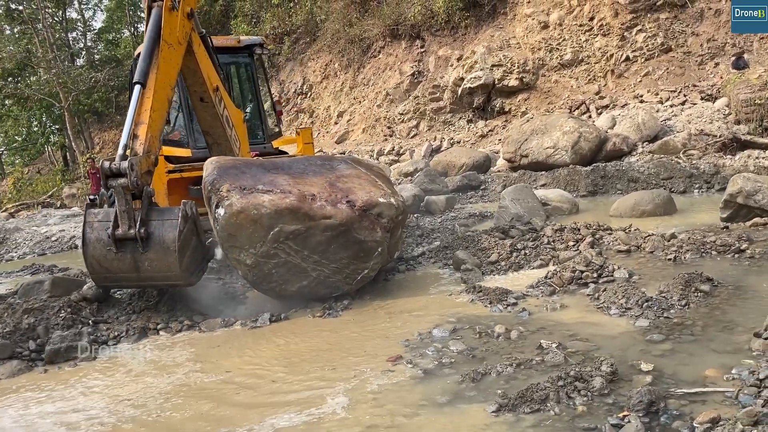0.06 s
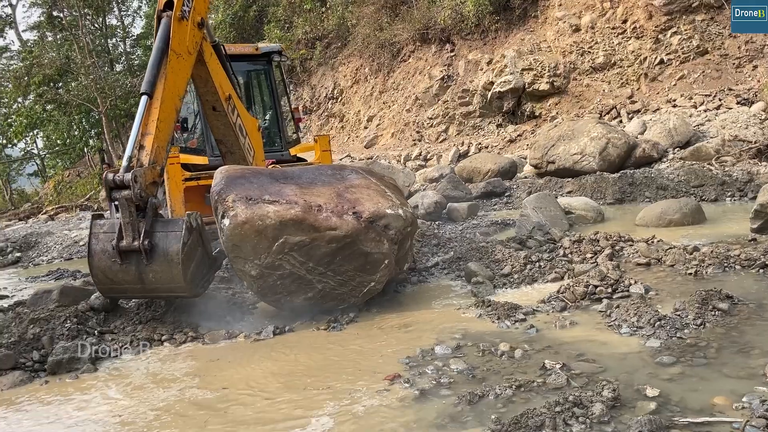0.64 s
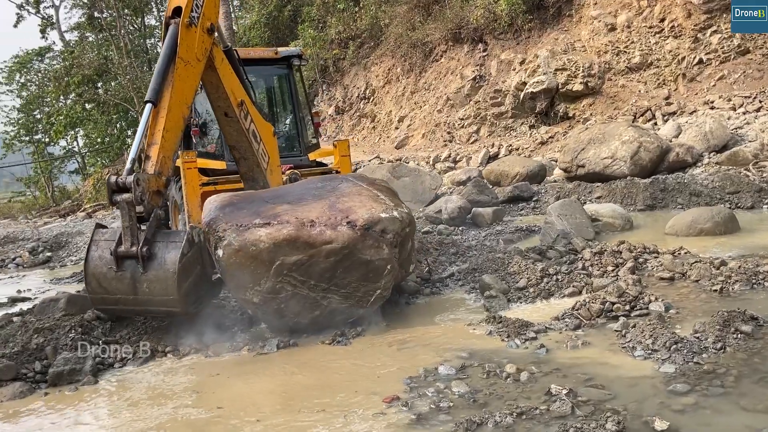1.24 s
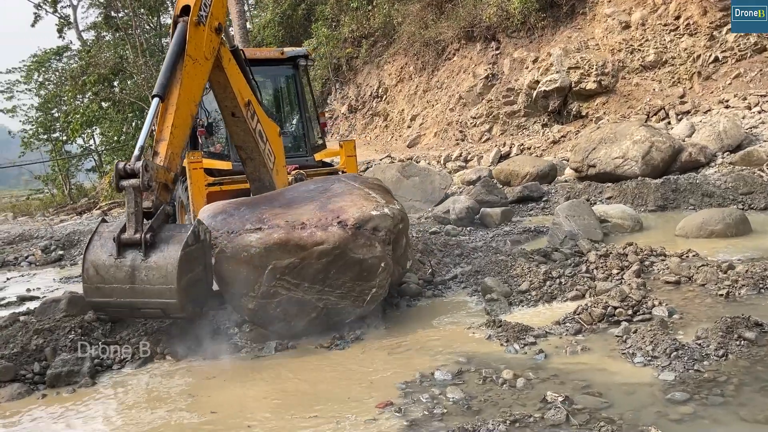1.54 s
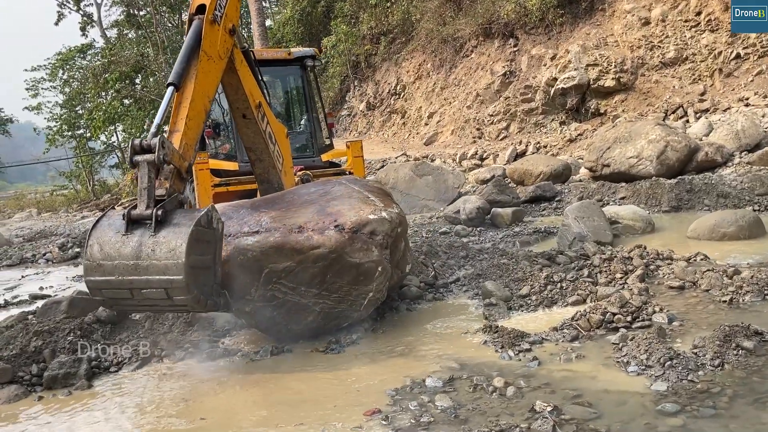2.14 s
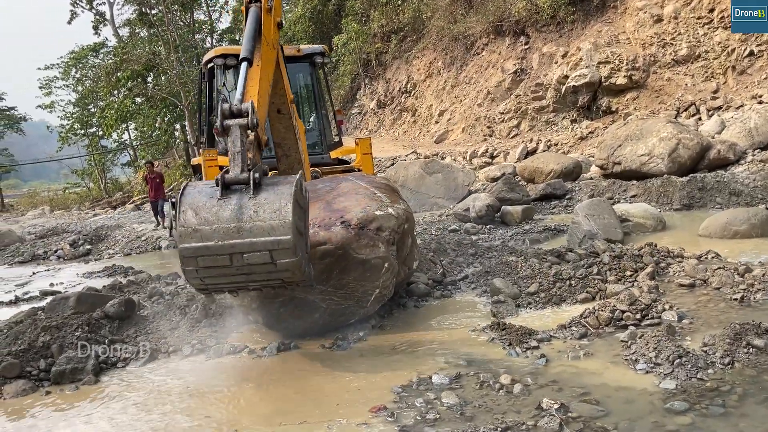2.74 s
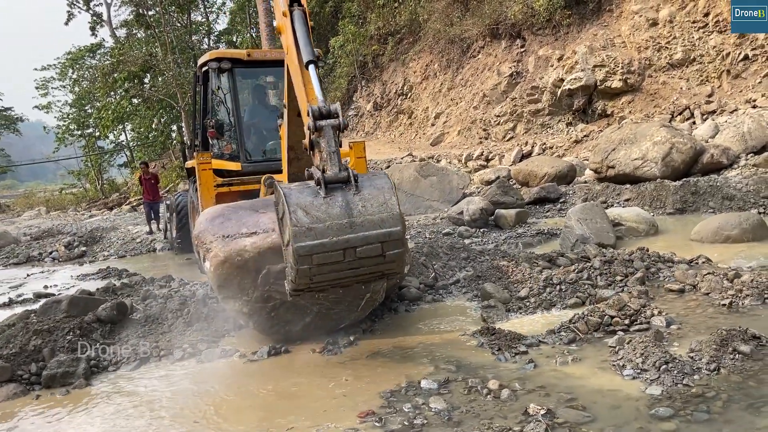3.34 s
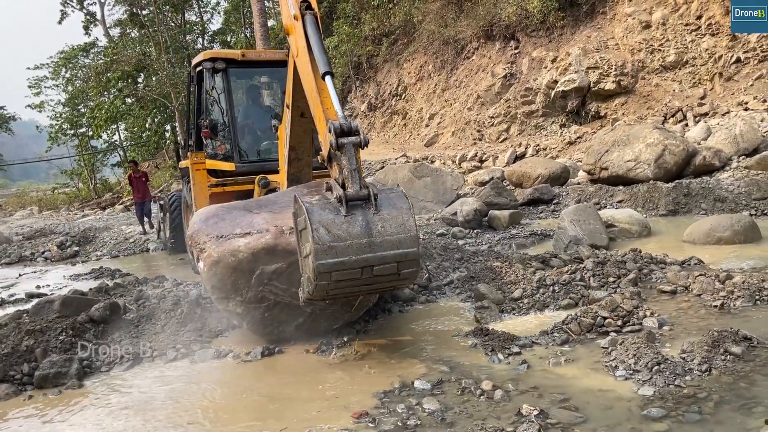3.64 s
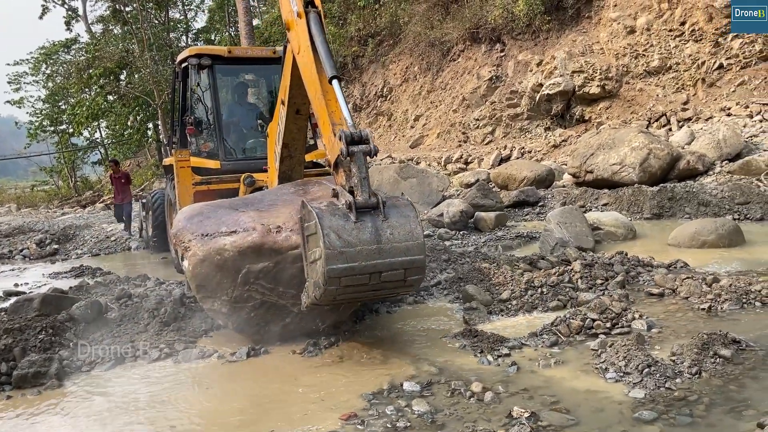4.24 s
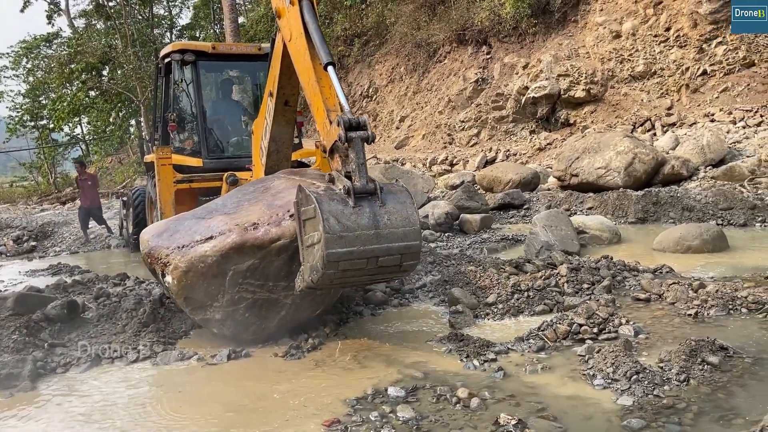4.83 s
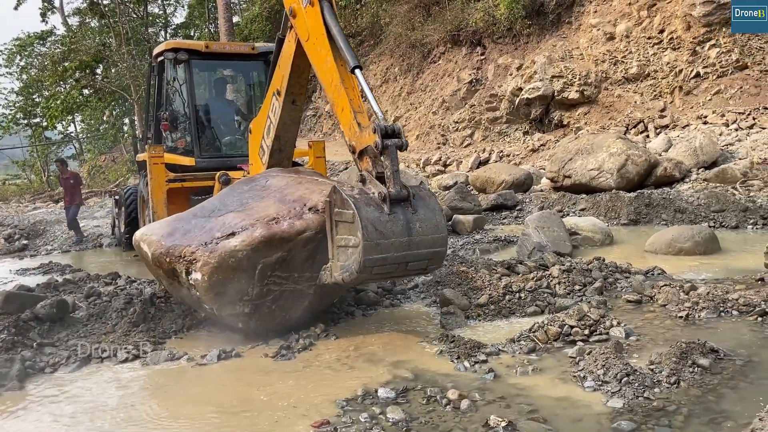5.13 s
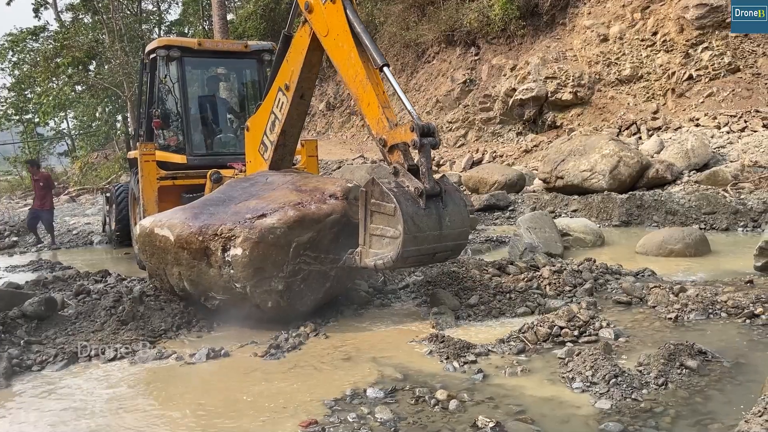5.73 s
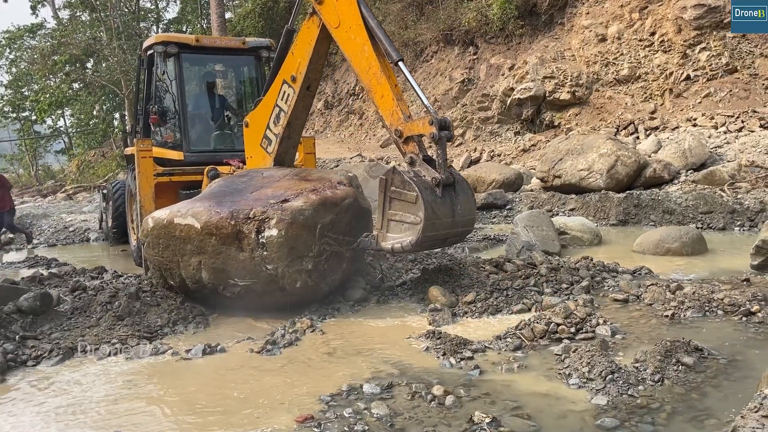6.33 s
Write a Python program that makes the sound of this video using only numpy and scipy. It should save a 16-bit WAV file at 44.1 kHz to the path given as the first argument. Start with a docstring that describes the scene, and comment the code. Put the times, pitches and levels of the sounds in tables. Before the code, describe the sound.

Over a steady diesel engine and shallow river, a digger bucket clanks and scrapes on rock, with low thuds and clicking stones.

```python
"""A backhoe loader's steel bucket works a boulder over a stony riverbed, ringing in its modes at each blow.
Stick-slip friction makes it grind, judder and groan; the boulder drags and crushes gravel amid low thuds,
cobbles knock and pebbles click. The diesel sounds harmonics of its firing rate, which sags under load,
and the river is a broadband wash behind it. The cut bank reflects a little of the work,
and a limiter ducks after the hardest blows."""
import sys
import numpy as np
from scipy import signal
from scipy.fft import rfft, irfft
from scipy.io import wavfile
from scipy.ndimage import uniform_filter1d, minimum_filter1d

SR = 44100
rng = np.random.default_rng(int(sys.argv[2]) if len(sys.argv) > 2 else 0)


def pcm_store(signal):
    """Save signal as 16-bit PCM."""
    levels = np.round(np.clip(np.atleast_2d(signal), -1, 1) * 32767)
    wavfile.write(sys.argv[1], SR, levels.astype(np.int16).T)


N = 285768
TIME = np.arange(N) / SR
BINS = np.fft.rfftfreq(N, 1 / SR)

# Levels are relative; a decay is the time to fall to 1/e.
# normal modes of the bucket: f/Hz, level/dB, T60/s
BUCKET_MODES = [(484.3, -3.5, 0.16), (580, -5.5, 0.023), (726, -17.5, 0.06), (913, -12, 0.098),
                (1042, -10, 0.069), (1088, -5.5, 0.066), (1119, -11, 0.073), (1240, -19, 0.018),
                (1333, -8.5, 0.063), (1393, -6, 0.036), (1495, -17.5, 0.05), (1534, -23, 0.049),
                (1610, -17, 0.06), (1760, -15.5, 0.053), (2130, -21.5, 0.078), (2500, -26, 0.095),
                (2920, -28, 0.04), (3510, -31, 0.088)]
# the bucket strikes the boulder: t/s, contact/s, crunch/dB, ring/dB, shell boom re ring/dB
BUCKET_KNOCKS = [(0.027, 0.012, -21, -22, -4.5), (1.012, 0.0099, -24, -20, -26),
                 (1.034, 0.02, -19, -19.5, -22), (1.254, 0.0089, -28, -19.5, -12),
                 (1.56, 0.045, -19.5, -5, -33), (3.288, 0.026, -26, -21.5, -20),
                 (3.308, 0.0048, -26, -19, -5), (3.412, 0.0077, -32, -23, 0), (3.73, 0.017, -13.5, -10, -8),
                 (3.768, 0.038, -15.5, -27, 11), (3.8, 0.049, -18.5, -18.5, 4),
                 (3.895, 0.019, -16.5, -22, -14), (3.915, 0.024, -13.5, -25.5, 6.5),
                 (5.293, 0.02, -19.5, -10, 4.5), (5.383, 0.0093, -22, -32, -8), (5.45, 0.02, -20, -15, -1),
                 (5.467, 0.014, -22.5, -15, -4), (5.585, 0.031, -7, -1, 2.5)]
# the pressed bucket breaks loose: t/s, crunch/dB, crack re crunch/dB, ring/dB, shell boom re ring/dB
BUCKET_JERKS = [(1.606, -20.5, 2.5, -22, -16), (1.659, -22.5, 3, -12, -15), (1.727, -21, 3, -11.5, -30),
                (1.795, -19, -3, -14.5, -12)]
# spectra of crushed stone, the dull crunch and the bright crack: f/Hz, level/dB
CRUNCH_SPECTRUM = [(35, -28), (60, 1), (130, 13), (250, 9.5), (380, 8.5), (560, 6.5), (850, -14.5),
                   (1200, -3), (1600, -5), (2200, -12), (3500, -25.5), (6000, -32), (12000, -30)]
CRACK_SPECTRUM = [(700, -36), (1600, 11.5), (2300, 2), (2900, 4), (3450, 5.5), (4000, 1), (4800, -1.5),
                  (7000, -7.5), (8800, -1.5), (11500, -10.5), (15000, -61)]
# a point of steel meets the rock: t/s, level/dB, f/Hz, decay/s
CLACK_HITS = [(0.029, -11.5, 1014, 0.009), (0.04, -17, 780, 0.018), (1.034, -15, 1235, 0.0065),
              (1.561, 1, 1350, 0.0076), (1.563, -10, 890, 0.0097), (1.591, -3, 1300, 0.008),
              (1.612, -14, 1290, 0.0095), (1.662, -10.5, 1050, 0.017), (1.733, -9, 1396, 0.0087),
              (1.795, -4, 607, 0.014), (1.795, -12, 1510, 0.0072), (3.414, -17.5, 912, 0.01),
              (3.731, -1, 1227, 0.0058), (3.769, -1, 520, 0.0063), (3.771, -15.5, 3440, 0.013),
              (3.804, -15, 1344, 0.0081), (3.917, -8.5, 659, 0.019), (3.919, -12, 1370, 0.0081),
              (5.295, -9.5, 1452, 0.021), (5.298, -1, 583, 0.015), (5.454, -22, 1150, 0.0064),
              (5.469, -15, 1197, 0.0098), (5.588, 1.5, 1157, 0.015), (5.589, -5, 1490, 0.01),
              (5.604, 0, 1240, 0.012)]
# modes of a clack: frequency ratio, level/dB
CLACK_PARTIALS = [(.87, -6), (1.002, 1), (1.14, -9), (1.33, -24)]
# rock slides on steel or gravel: t/s, duration/s, grind/dB, fizz/dB
SLIDE_STROKES = [(0.7, 0.44, -43.5, -49), (0.986, 0.091, -35, -56), (1.273, 0.083, -34.5, -35),
                 (1.362, 0.25, -31, -42), (1.549, 0.3, -21.5, -32.5), (1.897, 0.62, -42.5, -52),
                 (3.296, 0.41, -42, -49), (3.744, 0.09, -21.5, -34.5), (3.863, 0.31, -33, -42),
                 (4.785, 1, -37, -55.5), (5.126, 0.13, -35, -50), (5.298, 0.18, -44, -61),
                 (5.79, 0.85, -36.5, -56)]
# spectra of grinding rock and of fizzing sand: f/Hz, level/dB
GRIND_SPECTRUM = [(120, -64), (300, -45), (550, 8.5), (800, 7.5), (1150, 4), (1500, 0.5), (1850, -7.5),
                  (2300, -50), (3500, -21), (6000, -23), (12000, -42)]
FIZZ_SPECTRUM = [(1200, 18), (2400, 16.5), (3600, 14.5), (6000, 12), (8800, 9), (11500, 13.5), (15000, -48)]
# the bucket's edge rubs under pressure, and after 3.9 s the boulder rings on its own: t/s, duration/s,
# level/dB, mid-stroke f/Hz
GROAN_STROKES = [(1.387, 0.2, -27, 1109), (3.298, 0.029, -25, 894), (3.917, 0.068, -29, 749),
                 (4.02, 0.047, -33, 1293), (5.0, 0.23, -44, 1450), (5.13, 0.071, -31, 851),
                 (5.36, 0.12, -35.5, 1540), (5.287, 0.021, -21.5, 1660), (5.588, 0.0188, -12.5, 1204),
                 (5.887, 0.088, -39, 1080), (6.037, 0.098, -37.5, 1656)]
# low thuds and brief swells of the rumble: t/s, level/dB, f/Hz, time to peak/s
LOW_PULSES = [(0.021, -6.5, 121.5, 0.025), (1.57, -14.5, 136, 0.011), (1.672, -11, 141, 0.01),
              (1.716, -6.5, 128, 0.0087), (1.803, -18, 77.4, 0.018), (2.164, -19.5, 160, 0.041),
              (3.424, -16, 159, 0.027), (3.735, -9, 129, 0.015), (3.762, -4, 97, 0.0085),
              (3.797, -6, 118, 0.013), (3.913, -8.5, 120.4, 0.017), (4.02, -14, 104, .008),
              (4.113, -13, 120, 0.019), (4.248, -13, 161, 0.02), (5.302, -2.5, 142.5, 0.0099),
              (5.59, 1, 182, 0.0066), (5.594, -9, 161, 0.0077)]
# the boulder drags over its bed: t/s, duration/s, level/dB
DRAG_STROKES = [(1.565, 0.12, -29.5), (1.765, 0.08, -27), (3.74, 0.08, -22), (3.916, 0.068, -23),
                (4.02, 0.22, -37)]
# spectrum of the dragging: f/Hz, level/dB
DRAG_SPECTRUM = [(45, -18), (75, 5), (140, 9), (210, -10), (330, -1), (480, -6), (800, -9), (2000, -60)]
# cobbles collide under the boulder: t/s, level/dB, centre f/Hz
COBBLE_KNOCKS = [(1.014, -24, 1500), (1.023, -27, 2150), (1.036, -19, 1250), (1.212, -27.5, 1510),
                 (1.253, -24, 1950), (1.302, -24, 1550), (1.313, -30, 2000), (1.561, -22, 2410),
                 (1.617, -15, 2720), (1.683, -18, 2320), (1.745, -24, 2600), (1.762, -20, 1520),
                 (1.795, -16, 1704), (1.835, -21, 1406), (3.288, -18, 1130), (3.414, -26, 910),
                 (3.732, -16, 1360), (3.756, -14, 1100), (3.806, -17, 1720), (3.853, -20, 1606),
                 (3.897, -19, 1820), (3.918, -19, 1720), (3.95, -20, 1424), (4.011, -24, 1400),
                 (4.038, -27, 1380), (4.062, -25, 1220), (4.105, -29, 1870), (4.122, -23, 1250),
                 (4.134, -16, 412), (4.22, -26, 915), (4.276, -31.5, 1510), (5.056, -30, 1200),
                 (5.085, -26, 1310), (5.134, -28, 1150), (5.157, -16, 790), (5.2, -28, 1160),
                 (5.386, -27, 1560), (5.474, -26, 1920), (5.488, -16, 986), (5.918, -29, 1060),
                 (6.136, -23, 900), (6.164, -29, 1190)]
# the loudest snapping pebbles: t/s, level/dB, centre f/Hz
PEBBLE_SNAPS = [(0.028, -27.5, 5800), (1.253, -30.5, 2470), (1.293, -38, 6060), (1.311, -35, 3000),
                (1.322, -32, 5000), (1.346, -24, 8700), (1.364, -16.5, 6740), (1.378, -19, 6850),
                (1.396, -27, 5800), (1.407, -25.5, 7640), (1.428, -29, 8500), (1.463, -17.5, 10700),
                (1.48, -27, 9500), (1.503, -29.5, 8600), (1.561, -15.5, 9700), (1.587, -21, 5500),
                (1.611, -22, 6500), (1.659, -20, 6000), (1.737, -18, 5600), (1.745, -23, 5300),
                (1.793, -18, 6000), (2.207, -32, 2430), (2.283, -25.5, 2560), (2.304, -17.5, 2970),
                (2.347, -32, 5000), (2.492, -32, 9700), (2.773, -32.5, 3160), (3.086, -32, 9000),
                (3.732, -22, 7000), (3.77, -19, 3460), (3.805, -20.5, 3440), (3.775, -14, 8650),
                (4.012, -26, 4080), (4.231, -35, 3600), (4.277, -35.5, 3000), (6.118, -33, 9000)]
# faint, brief, very high chirps: t/s, level/dB, f/Hz
HIGH_CHIRPS = [(2.178, -36, 10700), (4.601, -27, 10540)]
# firing rate, which sags when the hydraulics take load: t/s, f/Hz
FIRING_RATE = [(0, 51), (.6, 52.1), (1.0, 54.8), (1.45, 53.3), (2.2, 54.3), (3.45, 55), (4.2, 54),
               (4.56, 49.1), (5.0, 50.1), (5.43, 53.9), (6.04, 49.9), (6.48, 51.7)]
# engine orders of the low exhaust note and the drone above it: multiple of the firing rate, level/dB
EXHAUST_ORDERS = [(1, -3), (1.5, -21), (2, -13), (3, -10.5), (3.5, -24), (4, -17.5)]
DRONE_ORDERS = [(4.5, -18), (5, -3.5), (6, -20), (7, -31), (8, -23.5), (11, -26.5)]
# strength of the exhaust note, which swells under load, and of the drone: t/s, level/dB
EXHAUST_LEVEL = [(0, -25.5), (.6, -27.5), (1.0, -29), (1.6, -32), (2.3, -30.5), (4.2, -28), (4.55, -27),
                 (5.0, -20.5), (5.45, -27.5), (5.9, -27), (6.48, -23)]
DRONE_LEVEL = [(0, -31), (.25, -29), (.64, -22.5), (.82, -42), (1.15, -34), (1.48, -23), (2.2, -30),
               (3.2, -31), (4.15, -38.5), (4.33, -18), (4.6, -23.5), (6.48, -22)]
# spectrum of the engine's rumble: f/Hz, level/dB
RUMBLE_SPECTRUM = [(35, -13), (60, -9), (85, -3.5), (115, -1), (160, -3.5), (200, -1.5), (260, -7.5),
                   (310, -9.5), (420, -10.5), (560, -14), (800, -20), (1200, -27), (2000, -36.5),
                   (4000, -50)]
# resonances of the engine covers: f/Hz, width/Hz, level/dB
PANEL_MODES = [(1037, 78, -49.5), (1343, 92, -54)]
# spectrum of shallow running water: f/Hz, level/dB
RIVER_SPECTRUM = [(200, 14), (600, 8.5), (1200, 8), (2200, 1.5), (4000, -1.5), (6500, -6), (9000, -2),
                  (11500, -4.5), (12400, -76), (13200, -50)]
# sound scattered from the sides: f/Hz, level/dB
SIDE_SPECTRUM = [(45, -41), (70, -21), (130, -24), (260, -16.5), (600, -10), (1250, -8.5), (2700, -4),
                 (6000, -10), (12000, -7.5)]
# phase difference between the microphone ports: f/Hz, lead of the left/rad
LEFT_LEAD = [(20, 0), (150, .02), (500, .08), (1300, .3), (3000, .6), (7800, .6), (8800, -.2), (9400, -1.5),
             (10250, -3.14), (11700, -6), (12600, -6.3)]
# level difference between the ports: f/Hz, left re right/dB
LEFT_EXCESS = [(50, -0.5), (400, 1.5), (1100, 1), (2200, 0.5), (3800, 3.5), (7000, 1.2), (10000, 0.1)]
# overall tone, with deep bass and top treble rolled off: f/Hz, level/dB
OVERALL_TONE = [(15, -36), (30, -18), (39, 0), (11700, 0), (12400, -8), (13100, -33), (15500, -37)]

CLACK_RISE_S = 0.0006  # onset of a hard contact, on steel or between cobbles


def bucket(rise_s=0.0011, release_s=0.01, jerk_s=0.038, knock_crack_db=-15.5, snap=0.23, snap_s=0.0064):
    """Impact excitation: each blow crushes stone and drives the steel, which chatters, then rings free."""
    crunch = unit(colour(grains(4000, 5.4), CRUNCH_SPECTRUM))
    crack = unit(colour(grains(5000, 3.6), CRACK_SPECTRUM))
    chatter = 0.61 * drift(220)
    t, out = TIME[:SR // 3], np.zeros(N)
    attack = 1 - np.exp(-t / rise_s)

    def blow(start, length, crunch_db, crack_db, ring_db, boom_db):
        """One contact force shapes both the noise of the stone and the ring of the steel."""
        now = slice(round(start * SR), round(start * SR) + len(t))
        touching = np.exp(-np.maximum(t - length, 0) / release_s)
        force = attack * np.exp(-t / length / 2) * touching
        crushing = amp(crunch_db) * force * (1 + snap * np.exp(-t / snap_s))
        stone = gap_echoes(crushing * (crunch[now] + amp(crack_db) * crack[now]))
        steel = amp(ring_db) * bucket_ring(force, attack, boom_db)
        return stone + steel * (1 + chatter[now] * touching)

    for start, length, crunch_db, ring_db, boom_db in BUCKET_KNOCKS:
        add(out, start, blow(start, length, crunch_db, knock_crack_db, ring_db, boom_db))
    for start, crunch_db, crack_db, ring_db, boom_db in BUCKET_JERKS:
        add(out, start, blow(start, jerk_s, crunch_db, crack_db, ring_db, boom_db))
    return out


def bucket_ring(force, attack, boom_db, shell_hz=800, first_hit=0.65, edge_echo_s=0.00123, detune=0.0081):
    """Modal resonance: damped modes start at first contact and build while the force acts."""
    t, out = TIME[:len(force)], np.zeros(len(force))
    for hz, db, t60 in BUCKET_MODES:
        turn, shift = rng.uniform(-1, 1, 2)
        build = signal.lfilter([1], [1, -1000 ** (-1 / (t60 * SR))], force)  # leaky integral of the force
        envelope = build / build.max() + first_hit * attack * amp(-60 * t / t60)
        edge_db = -0.5 * np.cos(2 * np.pi * hz * edge_echo_s)  # the echo from the edge favours some modes
        gain = amp(db + edge_db + boom_db * (hz < shell_hz)) / 2
        out += gain * envelope * np.sin(2 * np.pi * hz * (1 + detune * shift) * t + np.pi * turn)
    return out


def gap_echoes(x, echo_db=-8, longest_s=0.004, count=6):
    """Comb filtering: the gap between steel and rock adds close echoes, new ones at every contact."""
    taps = np.zeros(SR // 50)
    for late, sign in zip(rng.random(count), rng.choice([-1, 1], count)):
        taps[int(late * longest_s * SR) + 1] += sign * amp(echo_db)
    taps[0] = 1
    return signal.fftconvolve(x, taps / np.linalg.norm(taps))[:len(x)]


def clacks(detune=0.015):
    """Contact damping: a point of steel hits rock, and the pressure stops its close modes at once."""
    t, out = TIME[:SR // 8], np.zeros(N)
    attack = 1 - np.exp(-t / CLACK_RISE_S)
    for start, db, hz, decay_s in CLACK_HITS:
        shifts = 1 + detune * rng.uniform(-1, 1, len(CLACK_PARTIALS))
        ring = sum(amp(mode_db) * np.sin(2 * np.pi * hz * ratio * shift * t)
                   for (ratio, mode_db), shift in zip(CLACK_PARTIALS, shifts))
        add(out, start, amp(db) * attack * np.exp(-t / decay_s) * ring / 2)
    return out


def sliding(slip_db=1.4, fizz_slip_db=3.5, steel_db=-3, t60_share=0.06, rubble_db=-6, rubble_s=0.008):
    """Sliding friction: rock grinds in uneven slips on damped steel; rubble knocks and sand fizzes."""
    slips, t = drift(39), TIME[:SR // 8]
    damped_ring = sum(amp(db - 60 * t / (t60_share * t60)) * np.sin(2 * np.pi * hz * t)
                      for hz, db, t60 in BUCKET_MODES)
    steel = unit(signal.fftconvolve(grains(3500, 2.0), damped_ring)[:N])
    knocks = signal.fftconvolve(abs(grains(60, 0.86)), np.exp(-t / rubble_s))[:N]
    rubble = unit(colour(knocks * rng.standard_normal(N), GRIND_SPECTRUM))
    rock = unit(colour(grains(5000, 1.45), GRIND_SPECTRUM))
    grind = unit(rock + amp(steel_db) * steel + amp(rubble_db) * rubble) * amp(slip_db * slips)
    fizz = unit(colour(grains(3500, 3.5), FIZZ_SPECTRUM)) * amp(fizz_slip_db * slips)
    return sum(stroke(start, length) * (amp(grind_db) * grind + amp(fizz_db) * fizz)
               for start, length, grind_db, fizz_db in SLIDE_STROKES)


def groans(width_hz=210, climb=0.14):
    """Friction-driven vibration: rough tones of steel on rock, and once of the rock itself, rise in pitch and
    level with pressure."""
    roughness, out = drift(width_hz) + 1j * drift(width_hz), np.zeros(N)
    for start, length, db, hz in GROAN_STROKES:
        pressure = np.clip((TIME - start) / length, 0, 1)
        phase = 2 * np.pi * np.cumsum(hz * (1 + climb * (pressure - .5))) / SR
        out += amp(db) * np.sqrt(pressure) * stroke(start, length) * (roughness * np.exp(1j * phase)).real
    return out


def low_pulses():
    """Tone bursts: a few low cycles rise and die, heard as thuds or brief swells of the rumble."""
    t, out = TIME[:SR // 3], np.zeros(N)
    for start, db, hz, peak_s in LOW_PULSES:
        envelope = (t / peak_s * np.exp(1 - t / peak_s)) ** 1.54
        add(out, start, amp(db) * envelope * np.sin(2 * np.pi * hz * t))
    return out


def dragging(slips_per_s=120, slip_s=0.0053):
    """Stick-slip motion: the boulder's slips on its bed are noise bursts that merge into a low growl."""
    slips = signal.fftconvolve(abs(grains(slips_per_s, 1.2)), np.exp(-TIME[:SR // 8] / slip_s))[:N]
    growl = unit(colour(slips * rng.standard_normal(N), DRAG_SPECTRUM))
    return growl * sum(amp(db) * stroke(start, length) for start, length, db in DRAG_STROKES)


def cobbles(decay_s=0.0065, octaves=0.4, count=14):
    """Free vibration: fist-sized stones knock in a cluster of modes, the high ones dying first."""
    t, out = TIME[:SR // 12], np.zeros(N)
    attack = 1 - np.exp(-t / CLACK_RISE_S)
    for start, db, hz in COBBLE_KNOCKS:
        ratios = 2 ** np.clip(octaves * rng.standard_normal((count, 1)), -2, 2)
        modes = np.sin(2 * np.pi * (hz * ratios * t + rng.random((count, 1))))
        decays = np.exp(-t * np.sqrt(ratios) / decay_s)
        add(out, start, amp(db) * attack * (modes * decays).sum(0) * np.sqrt(2 / count))
    return out


def pebbles(decay_s=0.0038, octaves=0.57, faint_db=-62, faint_hz=4500, spread_db=4, faint_count=16):
    """Broad resonance: snapping pebbles ring for milliseconds, higher for smaller stones."""
    t, out = TIME[:2048], np.zeros(N)
    bins = np.fft.rfftfreq(len(t), 1 / SR) + 1
    faint = [(TIME[-1] * (when + 1) / 2, faint_db + spread_db * force, faint_hz * 2 ** octave)
             for when, force, octave in rng.uniform(-1, 1, (faint_count, 3))]
    for start, db, hz in faint + PEBBLE_SNAPS:
        resonance = 1 / (1 + (np.log2(bins / hz) / octaves) ** 2)
        ring = unit(irfft(rfft(rng.standard_normal(len(t))) * resonance))
        add(out, start, amp(db) * ring * np.exp(-t / decay_s))
    return out


def chirps(peak_s=0.0049, wobble_hz=130):
    """Random frequency modulation: faint, brief, very high chirps waver in pitch."""
    t, out = TIME[:SR // 8], np.zeros(N)
    envelope = t / peak_s * np.exp(1 - t / peak_s)
    for start, db, hz in HIGH_CHIRPS:
        cycles = np.cumsum(hz + wobble_hz * drift(320)[:len(t)]) / SR
        add(out, start, amp(db) * envelope * np.sin(2 * np.pi * cycles))
    return out


def bank_echo(x, t60=0.22, delay_s=0.01):
    """Scattering: the cut bank returns sparse, decaying reflections of unit total energy."""
    t = TIME[:SR // 2]
    taps = rng.choice([-1, 1], len(t)) * (rng.random(len(t)) < .1)
    taps = taps * (t > delay_s) * amp(-60 * t / t60)
    return signal.fftconvolve(x, taps / np.linalg.norm(taps))[:N]


def engine(free_hz=54, flutter=0.49, throb=0.033, chug_order=2.92):
    """Periodic combustion: orders of the firing rate sound over a rumble that throbs with each firing."""
    rate = curve(FIRING_RATE)
    sag_hz = free_hz - rate
    phase = 2 * np.pi * np.cumsum(rate) / SR
    tones = np.zeros(N)
    for orders, levels, waver in ((EXHAUST_ORDERS, EXHAUST_LEVEL, 0.11), (DRONE_ORDERS, DRONE_LEVEL, 0.025)):
        for order, db in orders:
            # the first and fifth orders hold; uneven combustion shakes the others
            shake = waver * drift(9) if order in (1, 5) else flutter * drift(22)
            tone = np.sqrt(2) * np.cos(order * phase + rng.uniform(0, 2 * np.pi))
            tones += amp(curve(levels) + db) * (1 + shake) * tone
    chug = ((drift(11) + 1j * drift(11)) * np.exp(1j * chug_order * phase)).real
    puffs = rng.standard_normal(N) * (1 + throb * np.cos(phase)) * amp(-0.16 * drift(33))
    rumble = unit(colour(puffs, RUMBLE_SPECTRUM))
    # as the engine sags, the uneven chug grows and the rumble drops
    return tones + amp(-30.5 + sag_hz) * chug + amp(-25 - 0.5 * sag_hz) * rumble


def panels():
    """Forced vibration: the running engine keeps its covers ringing faintly in narrow bands of noise."""
    response = sum(amp(db) * unit(1 / (1 + ((BINS - hz) / (width / 2)) ** 2))
                   for hz, width, db in PANEL_MODES)
    return irfft(rfft(rng.standard_normal(N)) * response, N)


def river(level_db=-41.5, splash_db=-9, swell_db=0.5):
    """Flow noise: shallow water over stones makes an even wash with fine splashes."""
    wash = rng.standard_normal(N) * amp(swell_db * drift(5.5))
    splashes = amp(splash_db) * grains(900, 0.57)
    return amp(level_db) * unit(colour(wash + splashes, RIVER_SPECTRUM))


def stroke(start, length, rise_s=0.0087, fall_s=0.017, swell_db=3.5):
    """Amplitude envelope of a slide: it takes hold, swells to its middle and dies away."""
    t = np.maximum(TIME - start, 0)
    swell = amp(swell_db * np.sin(np.pi * np.minimum(t / length, 1)))
    return np.minimum(t / rise_s, 1) * swell * np.exp(-np.maximum(t - length, 0) / fall_s)


def grains(per_s, spread_db):
    """Shot noise of unit rms: random clicks, many small and a few large."""
    size = amp(spread_db * np.minimum(rng.exponential(1, N), 4))
    return unit(size * rng.choice([-1, 1], N) * (rng.random(N) < per_s / SR))


def drift(rate_hz):
    """Random fluctuation: low-pass noise of unit rms."""
    return unit(irfft(rfft(rng.standard_normal(N)) * np.exp(-(BINS / rate_hz) ** 2), N))


def colour(x, spectrum):
    """Zero-phase filtering by a spectrum table."""
    return irfft(rfft(x) * amp(at_bins(spectrum)), N)


def at_bins(rows):
    """Interpolation of a table at every bin, on a log-frequency axis."""
    hz, value = np.transpose(rows)
    return np.interp(np.log(BINS + 1), np.log(hz), value)


def curve(rows):
    """Linear interpolation of a table at every sample."""
    return np.interp(TIME, *np.transpose(rows))


def amp(db):
    """Amplitude ratio of a level in decibels."""
    return 10 ** (np.asarray(db) / 20)


def unit(x):
    """Normalisation to unit rms."""
    return x / np.sqrt(np.mean(x ** 2) + 1e-20)


def add(mix, start, sound):
    """Superposition of a sound on the mix, from a start time in seconds."""
    part = mix[round(start * SR):][:len(sound)]
    part += sound[:len(part)]


def sources(event_gain, bank_db=-28):
    """Superposition of the short sounds, their faint reflection, the engine and the river."""
    events = bucket() + clacks() + low_pulses() + sliding() + dragging() + groans()
    events = event_gain * (events + cobbles() + pebbles() + chirps())
    return events + amp(bank_db) * bank_echo(events) + engine() + panels() + river()


def scene():
    """Direct and diffuse fields: the side sound has its own fine detail; short sounds are more direct."""
    ahead = sources(event_gain=0.88)
    side = colour(sources(event_gain=amp(-3)), SIDE_SPECTRUM)
    return np.array([ahead + side, ahead - side])


def record(dry, limit_db=-5.0, recover_db_per_s=75, hold_s=0.13, ceiling=0.81, cutoff_hz=15900):
    """Signal chain: two microphone ports, a limiter that holds and recovers, overload and a band limit."""
    lean = amp(at_bins(LEFT_EXCESS) / 2)
    ports = np.array([lean, np.exp(-1j * at_bins(LEFT_LEAD)) / lean])
    x = irfft(rfft(dry) * ports, N)
    power = abs(uniform_filter1d((x ** 2).mean(0), size=400))
    over_db = np.maximum(10 * np.log10(power + 1e-12) - limit_db, 0)
    half_hold = int(hold_s * SR / 2)
    held_db = -minimum_filter1d(-over_db, 2 * half_hold + 1, origin=half_hold - 100)  # running maximum
    recovery_db = TIME * recover_db_per_s
    duck_db = np.maximum.accumulate(held_db + recovery_db) - recovery_db
    x = x / amp(uniform_filter1d(duck_db, size=150))
    x = x / (1 + (x / ceiling) ** 6) ** (1 / 6)  # soft saturation
    x = colour(x, OVERALL_TONE)
    lowpass = signal.firwin(511, cutoff_hz, window=("kaiser", 9), fs=SR)
    return signal.oaconvolve(x, lowpass[None], "same", axes=1)


dry = scene()
out = record(dry)
pcm_store(out)
```